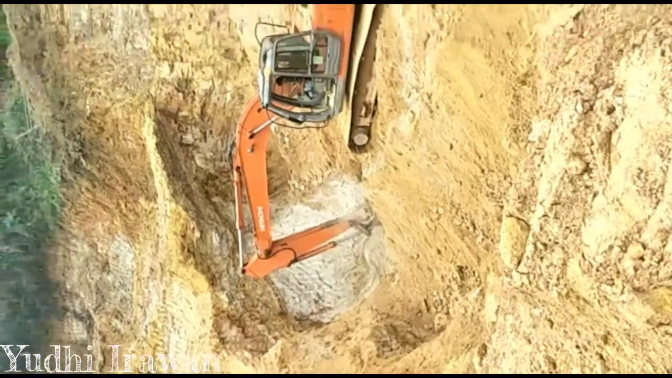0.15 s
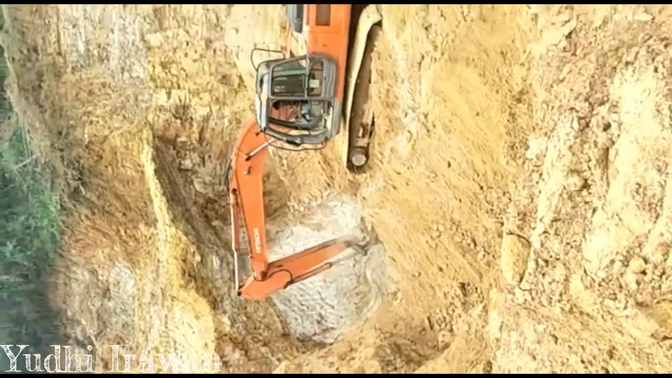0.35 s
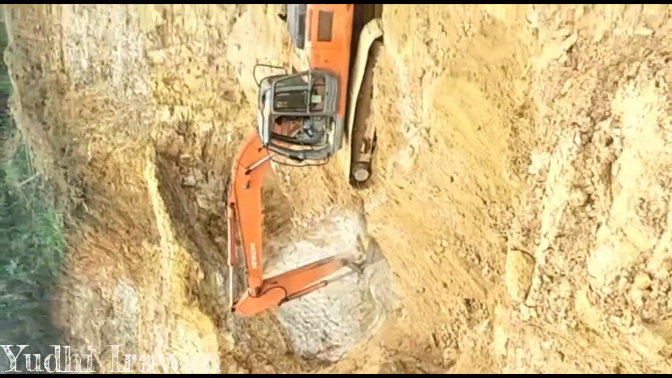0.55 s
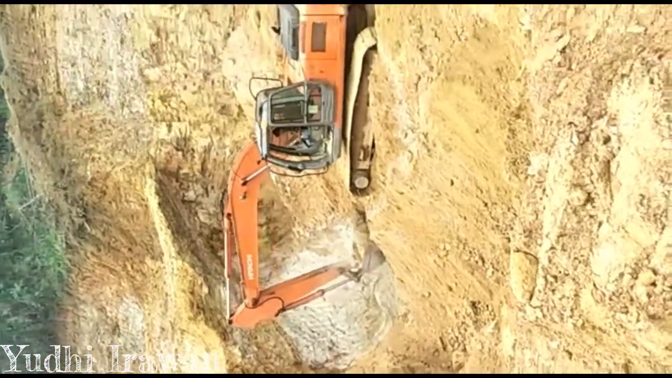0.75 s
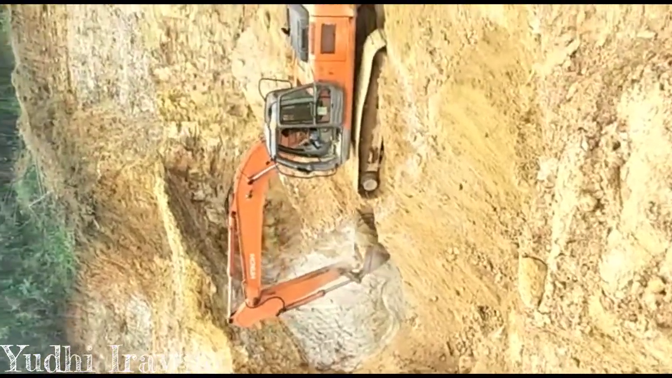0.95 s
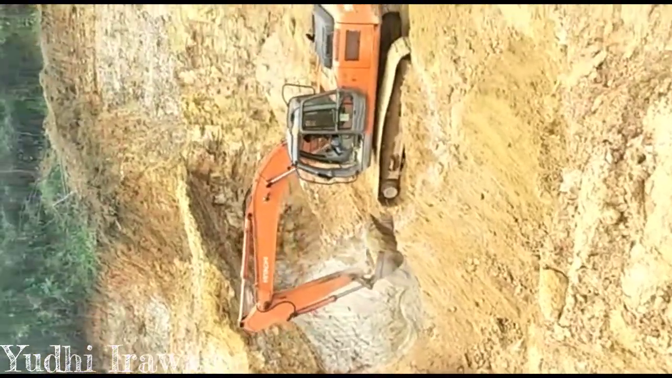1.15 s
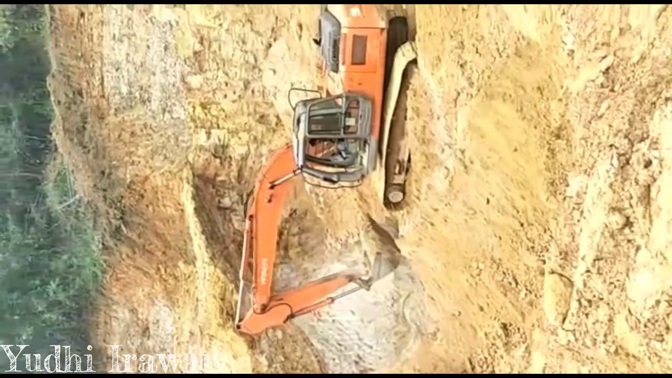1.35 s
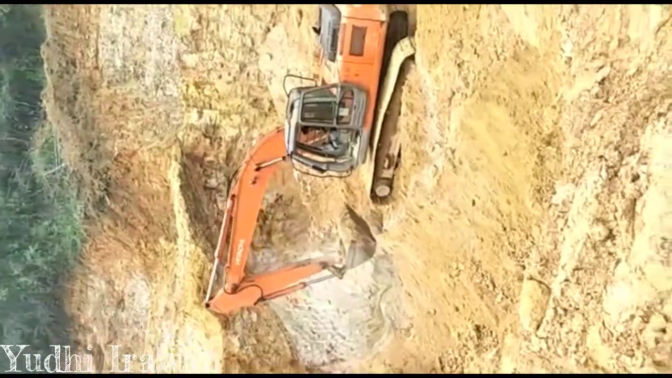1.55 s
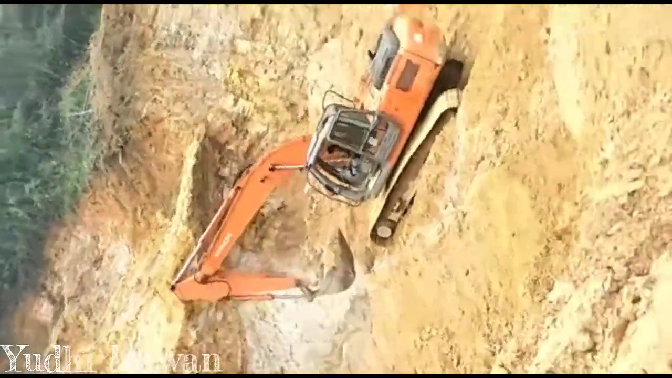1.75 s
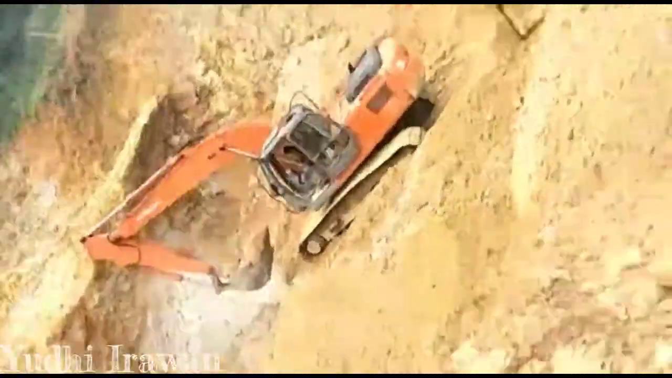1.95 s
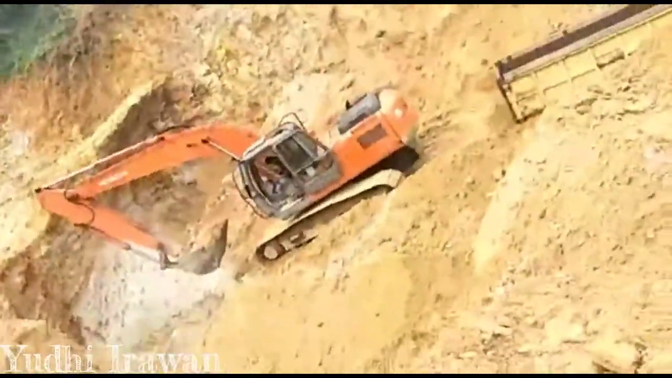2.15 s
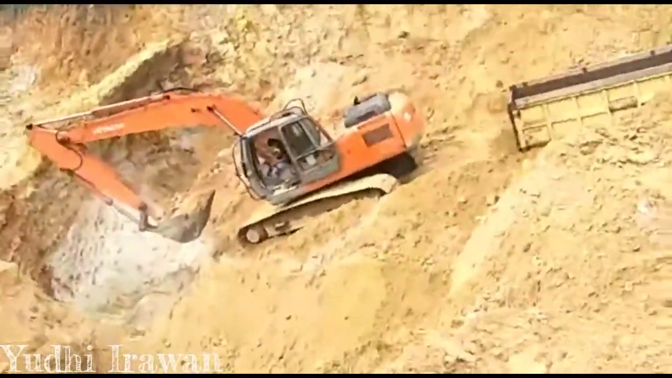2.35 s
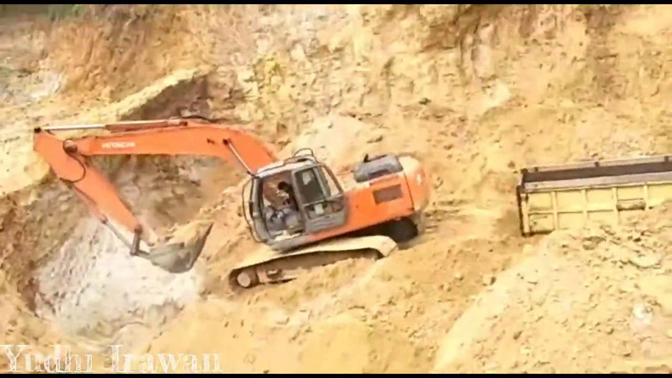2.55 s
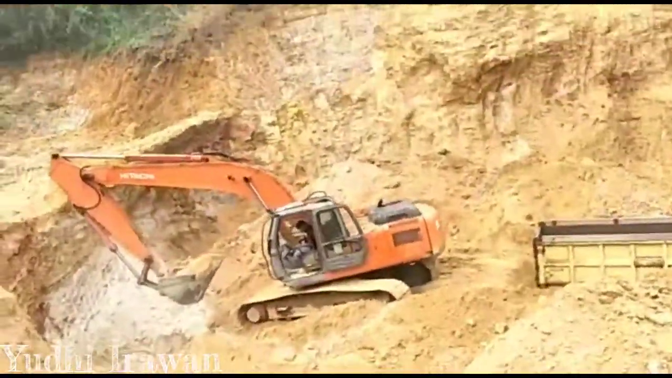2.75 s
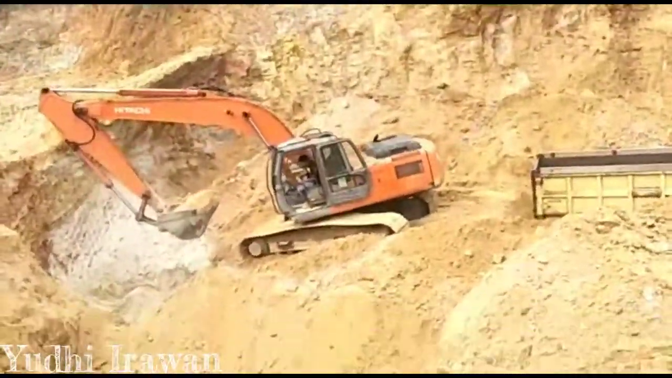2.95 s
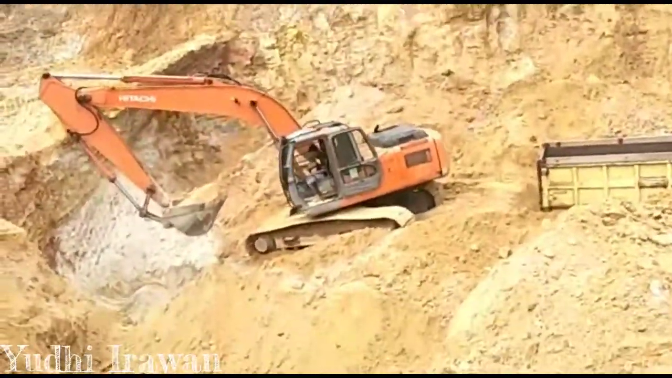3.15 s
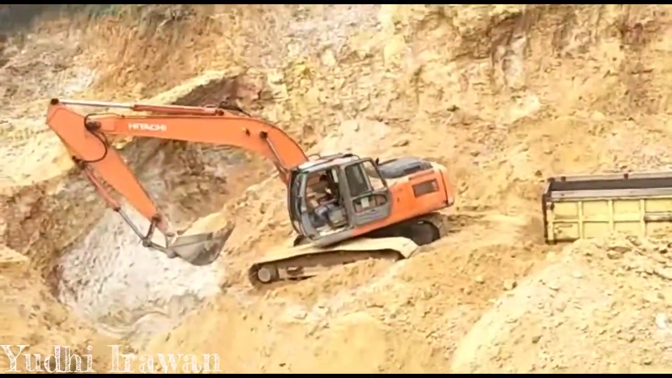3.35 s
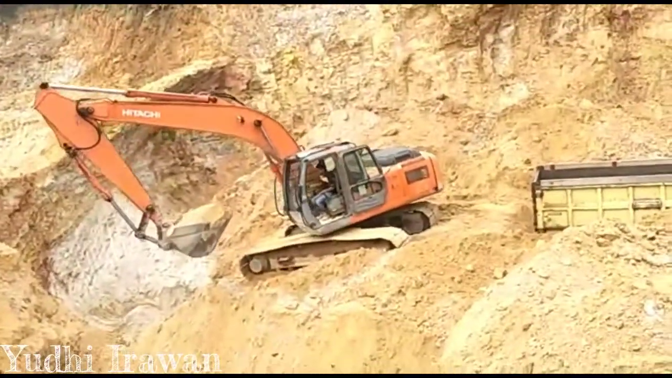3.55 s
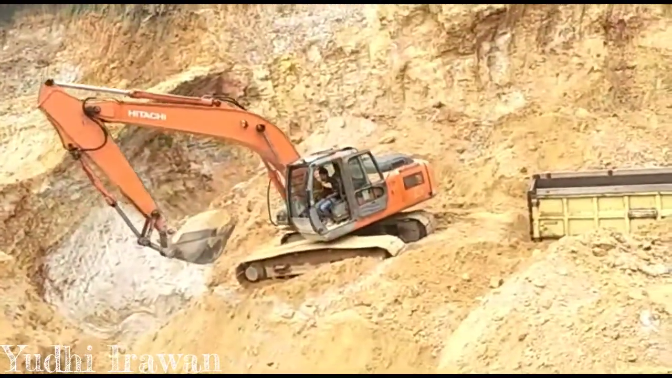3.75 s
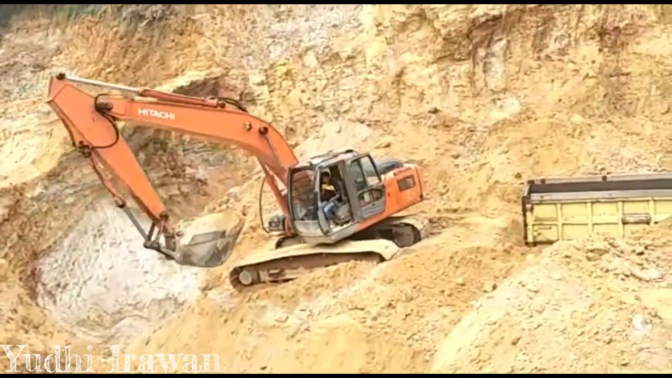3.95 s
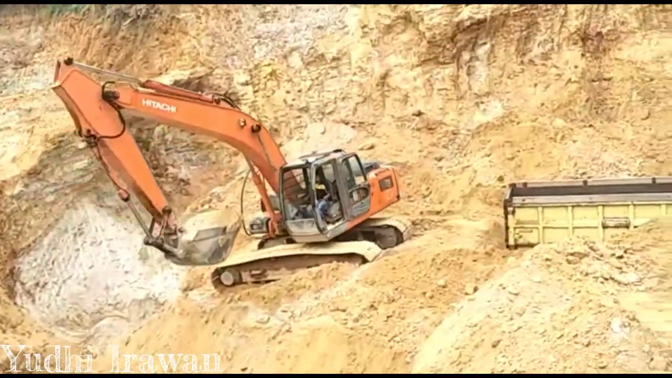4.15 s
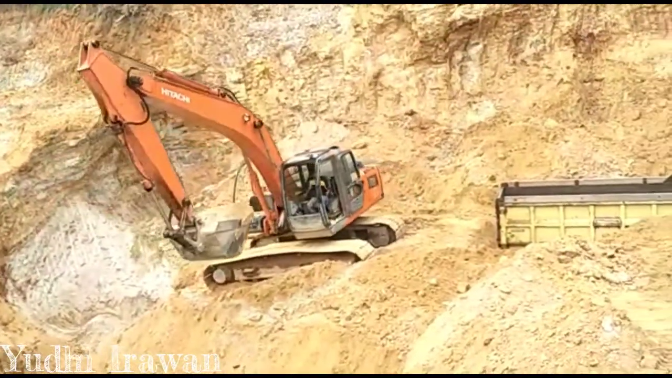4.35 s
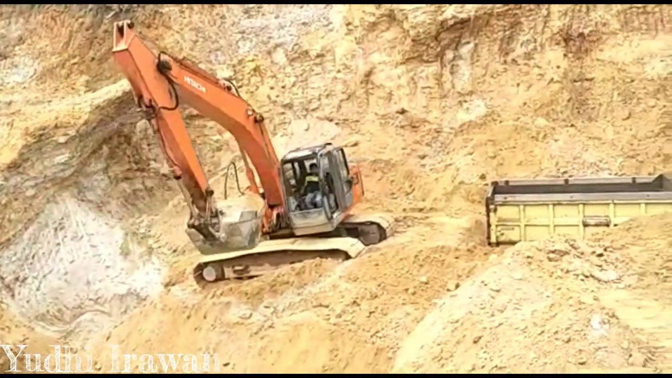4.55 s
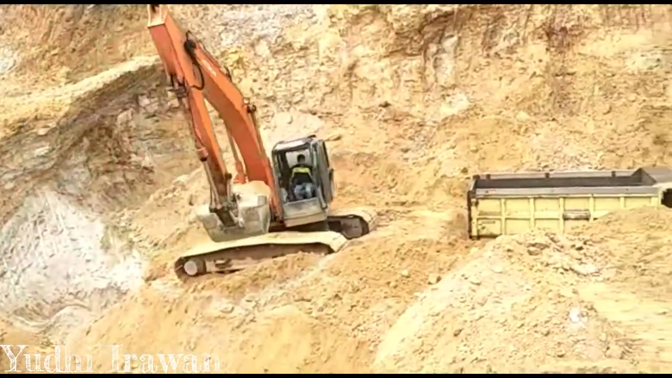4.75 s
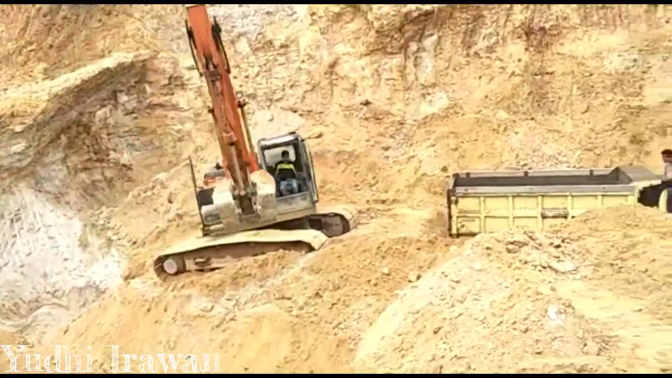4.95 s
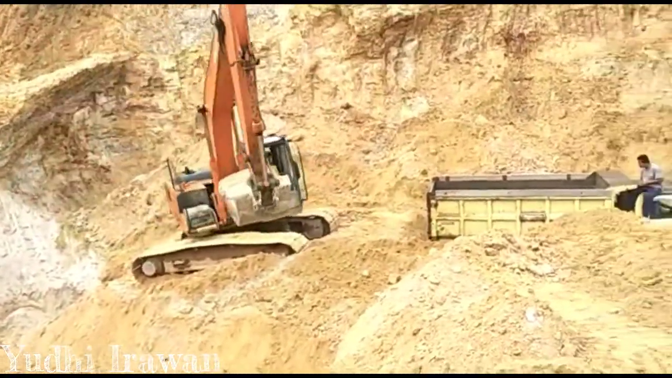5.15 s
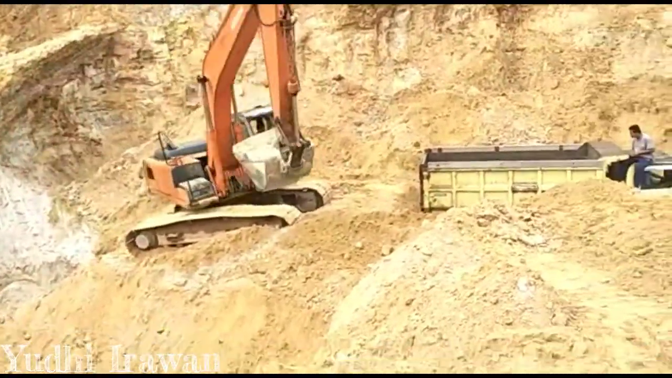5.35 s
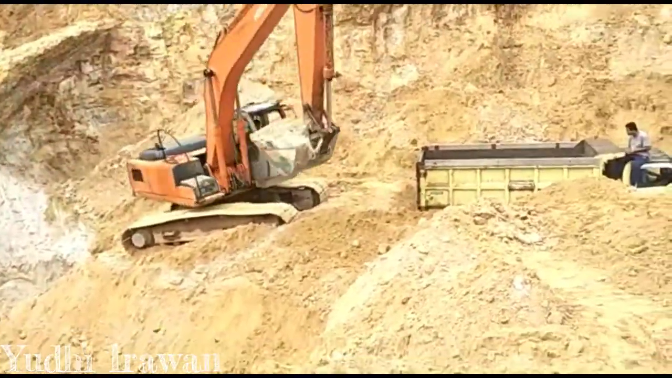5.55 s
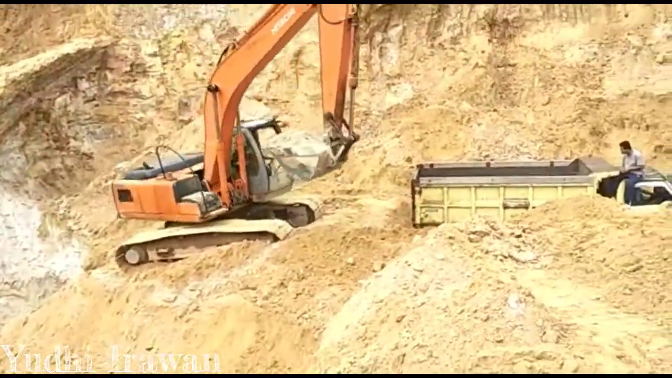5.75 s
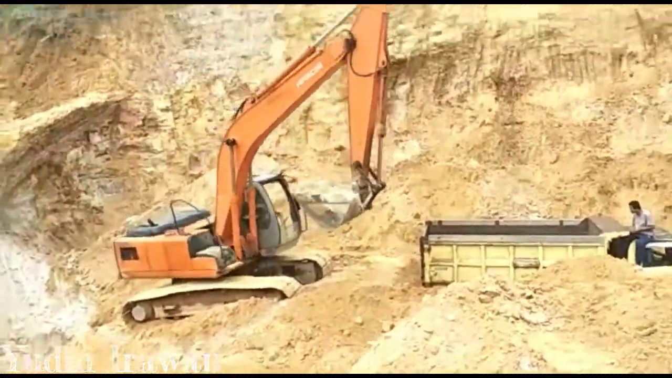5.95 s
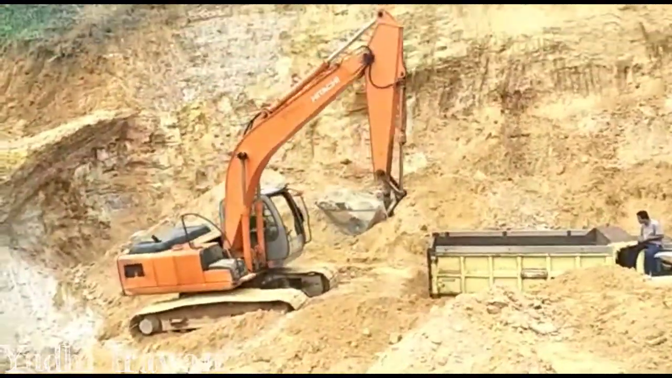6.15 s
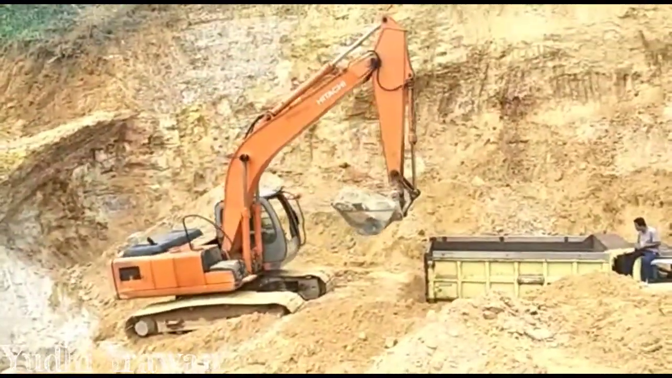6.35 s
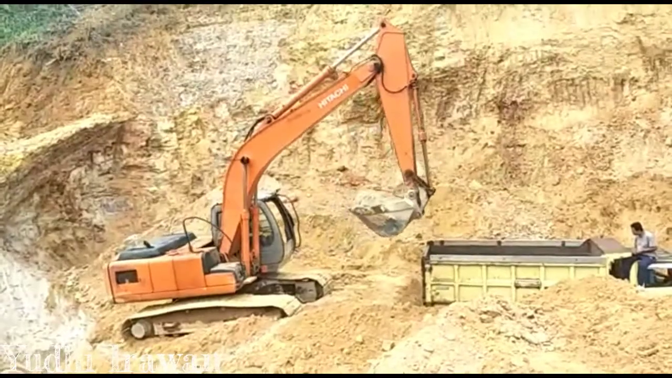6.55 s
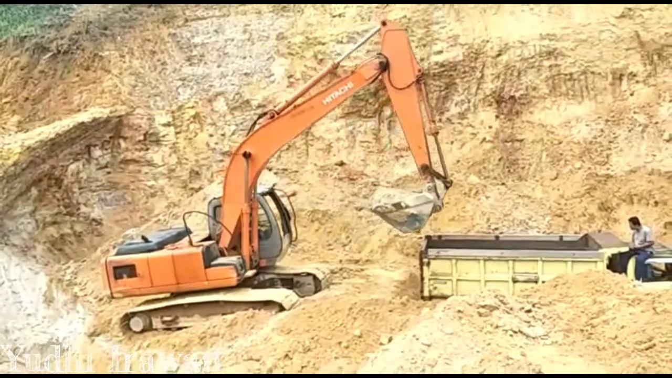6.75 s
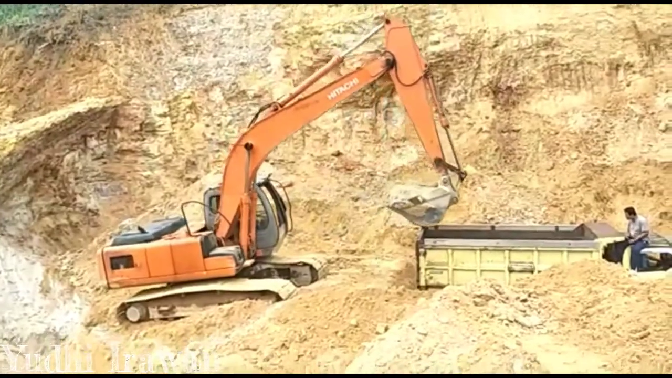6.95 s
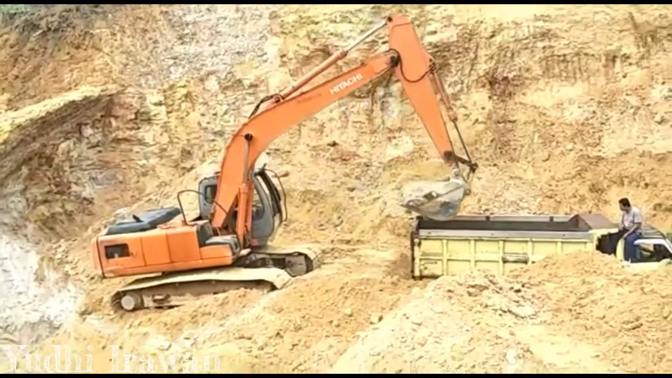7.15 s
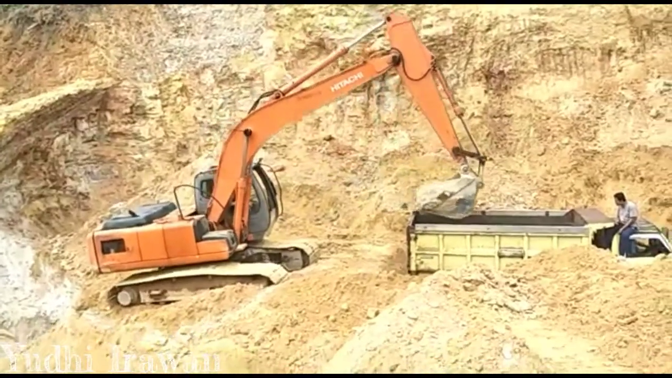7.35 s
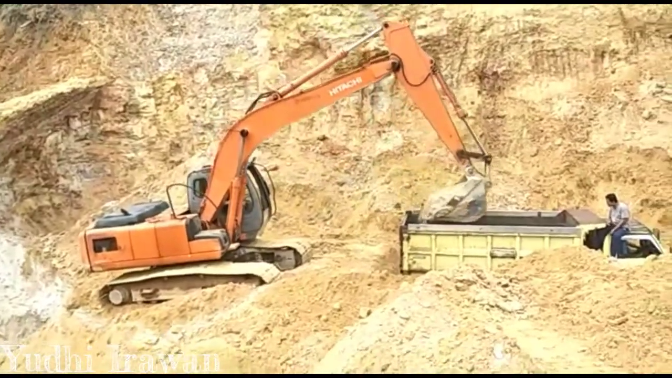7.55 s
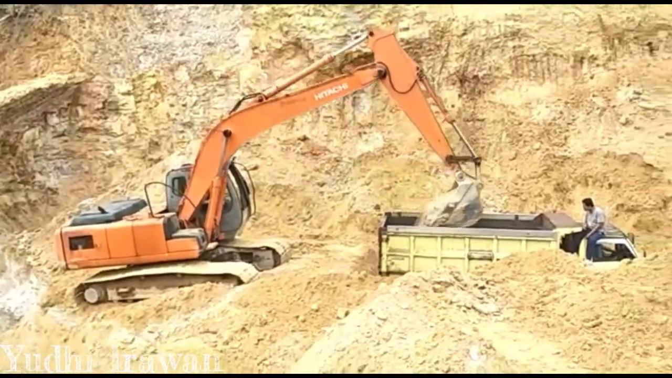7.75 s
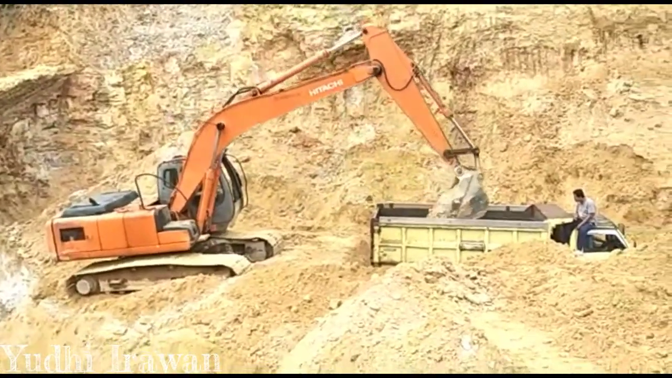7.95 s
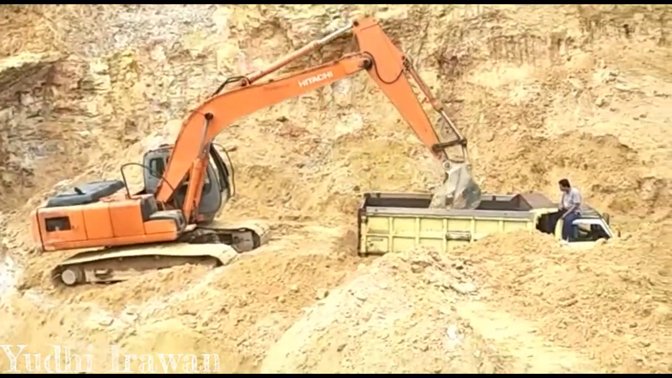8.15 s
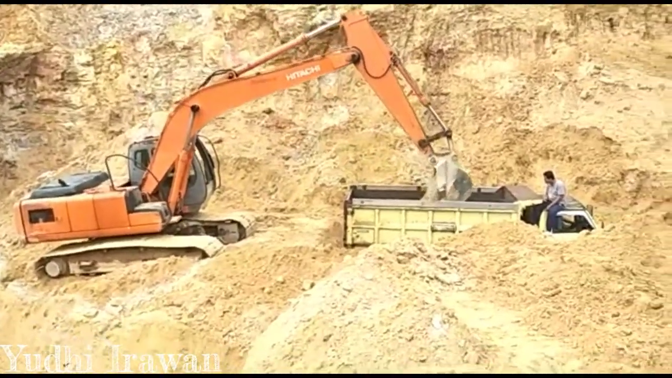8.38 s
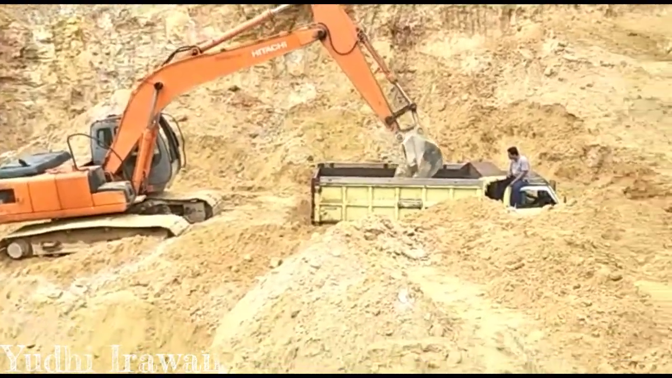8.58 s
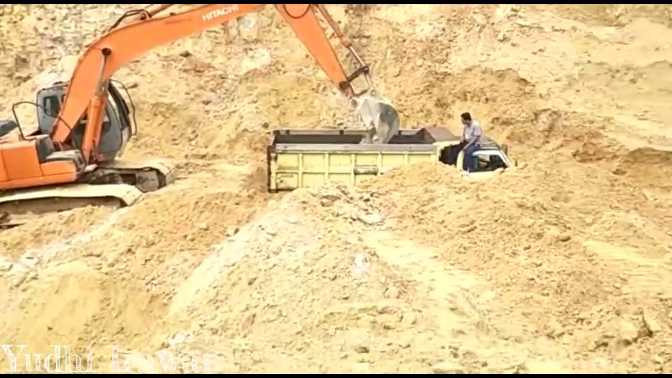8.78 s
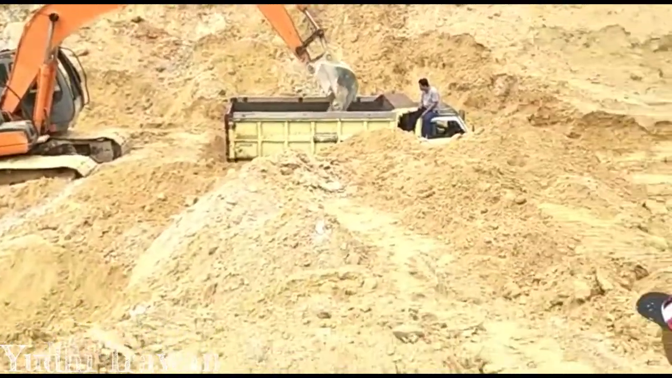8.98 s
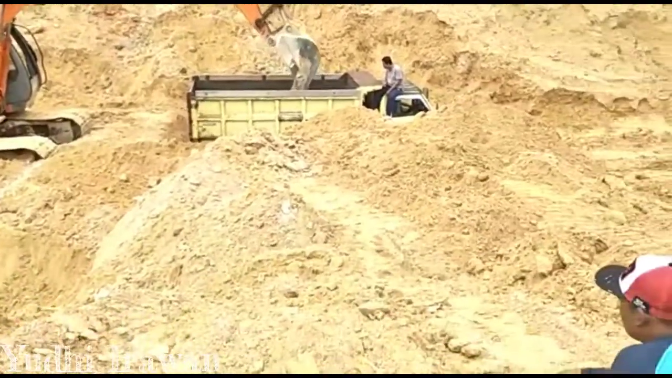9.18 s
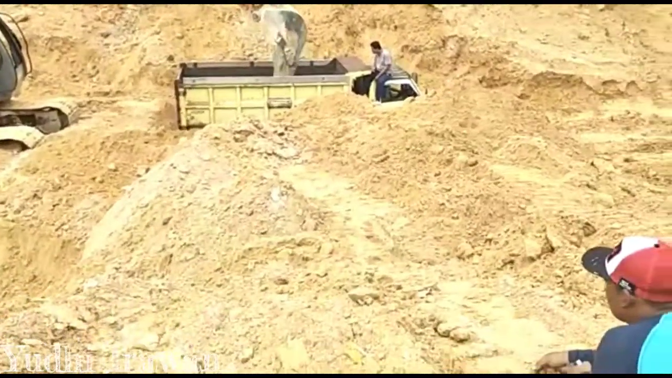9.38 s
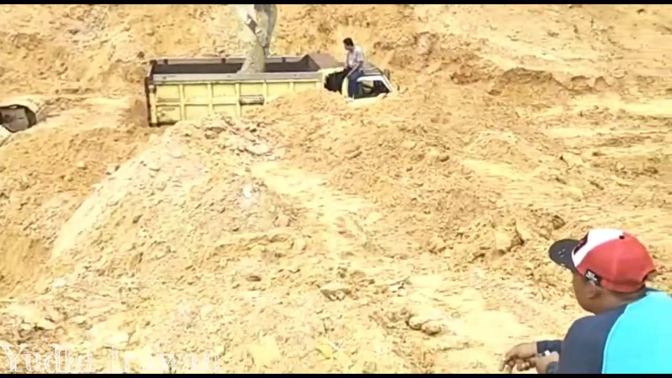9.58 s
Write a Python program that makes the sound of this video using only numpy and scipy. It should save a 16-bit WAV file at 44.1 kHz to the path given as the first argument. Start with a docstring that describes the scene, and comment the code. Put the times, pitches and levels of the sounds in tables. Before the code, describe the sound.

A diesel excavator runs steadily in an open quarry, heard from some distance on a hand-held stereo microphone. Its low throbbing hum carries pump whines and faint hydraulic squeals, with a few dull knocks of rock on steel. As the machine turns, a motor tone rises twice and the engine grows louder and brighter. Near the end, stones and gravel drop into a steel truck bed with a brief ringing crunch.

```python
"""A six-cylinder diesel excavator drones in an open pit, some way from a hand-held stereo microphone.
Exhaust, gear and pump tones ride on the crank speed over the roar of fan and block. The swing motor
climbs in pitch as the machine turns its engine side to the microphone, and oil squeals in the valves.
Rocks knock on steel, and near the end a load drops into a truck bed and rings it.
The sound fades in after a short silence."""
import sys
import numpy as np
from scipy import signal
from scipy.fft import rfft, irfft, next_fast_len
from scipy.io import wavfile
from scipy.ndimage import uniform_filter1d, map_coordinates

SR = 44100
rng = np.random.default_rng(int(sys.argv[2]) if len(sys.argv) > 2 else 0)


def int16_out(signal):
    """Quantize to a 16-bit WAV file."""
    q = np.round(np.clip(np.atleast_2d(signal).T, -1, 1) * 32767)
    wavfile.write(sys.argv[1], SR, q.astype(np.int16))


N = 424241

# engine speed: (time [s], crank turns [Hz])
CRANK_SPEED = [(.55, 33.7), (1.1, 34.05), (1.7, 33.9), (3.2, 33.45), (4.2, 33.7), (5.3, 33.71),
               (5.9, 34.09), (6.4, 33.6), (6.82, 32.98), (7.4, 33.46), (8.3, 33.9), (8.73, 34.6),
               (8.95, 34.22), (9.32, 33.3), (9.62, 33.4)]
# overall level, rising slowly to about 2.2 s, then swinging gently: (time [s], gain [dB])
OVERALL_GAIN = [(.55, -5.5), (1, -5.5), (2.2, -0.7), (3.7, 0.2), (4.9, -0.5), (5.5, -1), (6.5, 1.36),
                (7.5, 0.06), (8.5, -0.36), (9.62, -1.8)]
# stereo image in three views: microphone upright, level on the cab side, on the engine side:
# (frequency [Hz], left-right likeness [0-1], left lead [rad], left minus right [dB])
UPRIGHT_IMAGE = [(40, 0.998, 0.5, -0.5), (101, 0.97, 0, -1), (290, 0.99, 0, -1), (520, 0.98, -0.2, -20),
                 (720, .94, 0.2, 10), (1100, 0.88, 0.74, -3), (1800, 0.98, 1.67, -4), (2100, .3, 2, -1),
                 (2480, 0.95, 4, 8), (3350, .4, 3, 8), (3570, 0.86, 3, -3.5), (3700, 1, 4.5, 6.5),
                 (5140, 0.45, 11, 0), (6200, 0.89, 10.5, -0.5)]
CAB_IMAGE = [(40, 0.998, 0.02, -0.3), (101, 1, .02, -0.3), (500, 1, 0.16, 0), (900, 1, -.1, -0.5),
             (1200, 0.91, 0.36, -2.5), (1480, 0.68, 0.25, 1), (2100, 1, 0.13, -4), (2750, 0.45, 0.12, 3.5),
             (3600, 0.24, -0.65, -1.5), (4000, 0.94, -0.2, -7), (5000, 0.17, -0.4, 3.5),
             (8000, 0.15, 0, -8.5)]
ENGINE_IMAGE = [(40, .998, 0.5, -0.5), (101, 0.98, 0.2, 0), (200, 0.99, 0.16, -0.1), (383, 1, -0.46, -2),
                (550, 0.86, 2, -4.5), (685, 1, 0, 8.5), (1140, 0.66, 1.13, -7.5), (1670, 0.72, 4.5, 1),
                (2220, 0.38, 3.5, -3.5), (2674, 0.47, 5, 0), (4090, 0.35, 16.5, 0),
                (5000, 0.92, 16.5, -1.5), (5280, 0.33, 11, 0.5)]


def engine_drone(phase, shares):
    """The firing tone, its octave and overtones, plus a pump or fan hum at 7 times crank speed."""
    # (time [s], level of orders 6, 12, 14 [dB])
    drone = [(.55, -29, -44, -41.5), (1.5, -26, -59.5, -48.5), (2, -25, -56, -45.5), (2.5, -25, -41, -37),
             (3.1, -25, -35, -51), (3.6, -24.5, -43, -37), (4, -23, -41, -32.5), (4.4, -24, -45, -55),
             (4.8, -26.5, -38.5, -34.5), (5.55, -21, -30, -29.5), (5.87, -26, -39, -37),
             (6.36, -34.5, -31, -27), (6.85, -25, -26, -25.5), (7.4, -26.5, -23.5, -33.5),
             (8.1, -25.5, -25.5, -29), (8.55, -24, -26.5, -28), (8.86, -23, -30, -45),
             (9.2, -25.5, -24.5, -26.5), (9.62, -28.5, -23.5, -27)]
    # (time [s], level of orders 10, 11, 18, 20 [dB])
    overtones = [(0.55, -67, -46.5, -54, -58), (1.5, -55, -41.5, -46.5, -48), (2.5, -57.5, -40, -40.5, -53),
                 (3.6, -44.5, -40.5, -37.0, -46.0), (4.4, -39.5, -39, -54, -50), (5, -38, -37.0, -46, -50),
                 (5.3, -34, -33, -47, -48.5), (5.7, -36.0, -26.5, -32.5, -46), (6, -33, -28.5, -34.5, -39),
                 (6.3, -39.5, -44, -35, -54), (6.6, -39.5, -29, -37, -34.5), (6.9, -36.0, -34, -29, -40),
                 (7.3, -32.0, -38, -38.5, -41), (7.7, -40, -49, -41, -39), (8.1, -41, -34, -38, -42),
                 (8.55, -39.0, -45.0, -32.5, -38), (8.9, -38.5, -33.0, -29, -45),
                 (9.25, -44, -33.0, -37, -40), (9.55, -36.0, -40.0, -31.5, -40.5)]
    out = 0
    for order, db, waver_db, blur_rad in zip((6, 12, 14), curves(drone), (1.17, .6, .6), (.05, .33, .33)):
        out += tone(order, db, phase, shares, waver_db, blur_rad)
    for order, db in zip((10, 11, 18, 20), curves(overtones)):
        out += tone(order, db, phase, shares, waver_db=2.2, blur_rad=0.3)
    return out


def high_whines(phase, shares):
    """Three high whines that follow crank speed, from engine, gear and pump."""
    # (time [s], level of orders 48, 68, 84 [dB])
    levels = [(0.55, -69, -59, -82), (2, -54.5, -67.5, -57), (3.5, -48, -52.5, -72),
              (5.2, -49.5, -53, -61.5), (5.9, -43, -45, -62), (6.3, -38.5, -42, -52), (6.6, -46, -35, -57),
              (6.8, -30.5, -36.5, -55), (7.05, -42.5, -39, -49), (7.4, -37, -37, -39.5),
              (7.8, -39, -37, -43.5), (8.25, -45, -35.5, -39.5), (8.55, -44, -40, -55),
              (8.9, -46, -39.5, -48), (9.25, -39, -36, -39), (9.55, -42, -31, -43)]
    return sum(tone(order, db, phase, shares, waver_db=1.3, blur_rad=1.37, lean_db=lean_db)
               for order, db, lean_db in zip((48, 68, 84), curves(levels), (-3, -3, -6)))


def pump_whine(phase, shares, lull_db):
    """Two tones of the hydraulic pump; load lifts the lower and weakens the upper."""
    # (order, level at facing 0, 0.8 and 1 [dB], share of the swell, gain by crank sag [dB/Hz^2],
    # waver [dB], left minus right [dB])
    whines = [(28, -43.5, -43, -33, 1.1, 1.5, 2.5, -1), (42, -55, -48, -47, .8, -4, 3, -1)]
    # swell of the whine: (time [s], gain [dB])
    swell = [(.55, -5), (1.75, -4), (2, 2), (2.75, 3), (3, -2), (3.6, -3), (4.4, 2), (5.1, -3), (5.9, 1.5),
             (6.8, 0.5), (7.8, 4), (8.75, -3), (9.15, -0.8), (9.62, -1)]
    out = 0
    for order, *levels, share, load_db, waver_db, lean_db in whines:
        db = np.interp(shares[-1], (0, 0.8, 1), levels) + lull_db + share * curves(swell)[0]
        db += load_db * np.maximum(sag_hz(), 0) ** 2
        out += tone(order, db, phase, shares, waver_db, blur_rad=1.85, lean_db=lean_db)
    return out


def weak_tones(phase, shares, lull_db):
    """Weak engine orders around the main tones, plus two sidebands of the gear whine."""
    # (order before rounding, cab side [dB], engine side [dB])
    weak_orders = [(3, -52, -41.5), (4, -59, -47), (7, -66, -54), (8, -44.5, -42), (9, -51, -39),
                   (13, -62, -43), (22, -55, -46), (15, -50.5, -42), (16, -47, -40.5), (19, -50.5, -47),
                   (21, -58.5, -46), (24, -54.5, -45), (25, -57, -46.5), (65.9, -63.5, -47),
                   (70.1, -64.5, -47), (56, -52.5, -43.5)]
    out = 0
    for order, cab_db, engine_db in weak_orders:
        db = cab_db + shares[-1] * (engine_db - cab_db) + lull_db
        out += tone(round(order), db, phase, shares, waver_db=2.5, blur_rad=0.81)
    return out


def tone(order, db, phase, shares, waver_db, blur_rad, lean_db=0):
    """One multiple of the cycle rate at the microphone; level and phase waver with the air."""
    hz = order * np.mean(np.diff(phase)) * SR / (2 * np.pi)
    images = [along(image, hz) for image in (UPRIGHT_IMAGE, CAB_IMAGE, ENGINE_IMAGE)]
    _, lead, lean = np.transpose(images) @ shares / 2
    lean = lean + lean_db / 2
    locked = order % 2 == 0 and order <= 14  # low crank multiples line up: one throb a turn
    angle = order * phase + rng.uniform(0, 2 * np.pi) * (not locked) + blur_rad * wobble(1.6)
    size = np.sqrt(2) * amp(db + waver_db * wobble(4.5))
    return size * np.array([amp(lean) * np.sin(angle + lead), amp(-lean) * np.sin(angle - lead)])


def roar(phase, shares):
    """Fan, block and intake noise; it throbs with each crank turn and with the valve clatter."""
    # noise colour in each view, low and high bands: (frequency [Hz], relative level [dB])
    cab_low = [(15, -48), (30, -26.5), (60, -9.5), (95, -10), (130, -6.5), (200, -9.5), (306, -4),
               (420, -19), (545, -35), (826, -26), (1500, -37.5), (2400, -89)]
    cab_high = [(880, -44.5), (1500, -4.5), (1880, 2.5), (2120, 0), (2390, -7), (2740, -3), (3150, -9.5),
                (3470, -1.5), (3720, -9), (4110, -11.5), (5750, -23), (7150, -34), (9150, -53),
                (14400, -50), (15900, -58.5)]
    upright_high = [(880, -35.5), (1500, 2), (1830, 6.5), (2000, -1.5), (2430, -1.5), (2940, -17.5),
                    (3120, -0.5), (3540, -7), (3950, -6), (6740, -19), (8880, -44), (9150, -66),
                    (10200, -36.5), (11100, -57), (15900, -57)]
    engine_low = [(15, -36.5), (30, -23), (60, -13), (95, -12), (146, -3.5), (218, -2.5), (330, -5),
                  (464, -10), (566, -28), (797, -16), (1100, -17), (1500, -23), (2400, -81.5)]
    engine_high = [(880, -40), (1500, -5.5), (1880, 0), (2430, -1.5), (2770, -0.5), (3150, -5.5),
                   (3580, -5), (4490, -5.5), (4860, -13.5), (5470, -10), (6220, -16), (6940, -27.5),
                   (10400, -39), (14000, -34.5), (15900, -33.5)]
    views = [noise_bands(cab_low, upright_high, UPRIGHT_IMAGE, patchy_db=1.54),
             noise_bands(cab_low, cab_high, CAB_IMAGE, patchy_db=1.28),
             noise_bands(engine_low, engine_high, ENGINE_IMAGE, patchy_db=1.11)]
    crank = np.cos(2 * phase)
    valves = np.cos(3 * phase) + 0.31 * np.cos(6 * phase)
    gust_db = 0.27 * wobble(4.9)
    crank_db, valve_db = (0.31, 0.57, 0.3, .5, .4), (0, 0.1, 0.18, 0.42, .5)
    flutter_db = (0.31, 0.13, 0.21, 0.41, .9)
    out = 0
    for k, db in enumerate(band_levels(shares[-1])):
        throb = crank_db[k] * crank + valve_db[k] * valves + gust_db + flutter_db[k] * wobble(16)
        out += amp(db + throb) * sum(np.sqrt(share) * view[k] for share, view in zip(shares, views))
    return out


def noise_bands(low, high, image, patchy_db):
    """The machine's noise across the pit in one view, as five stereo bands of equal level."""
    # moving notch as the microphone turns and is shaded: (time [s], frequency [Hz], depth [dB])
    shading_dip = [(0, 1970, 1.5), (1.8, 1954, 3.5), (2.8, 1430, 0), (5.2, 1340, 4.5), (6, 1740, 0),
                   (9.62, 1680, 2.5)]
    hz, t, noise = signal.stft(rng.standard_normal((2, N)), SR, nperseg=1024)
    hz = hz[:, None]
    patches = unit(uniform_filter1d(uniform_filter1d(rng.standard_normal(noise.shape[1:]), 8, 0), 6, 1))
    scatter_db = patchy_db * (1 + (hz / 6000) ** 2).clip(1, 3.5) * patches  # air scatters treble most
    dip_hz, dip_db = curves(shading_dip, t)
    gain = amp(scatter_db - dip_db * np.exp(-((hz - dip_hz) / 250) ** 2))
    alike, lead, lean = along(image, hz)
    spread = np.arccos(np.clip(alike, 0, 1)) / 2
    mid, side = noise[0] * np.cos(spread), noise[1] * np.sin(spread)
    pan = amp(lean / 2) * np.exp(.5j * lead)
    spectra = gain * np.array([(mid + side) * pan, (mid - side) / pan])
    pair = signal.istft(spectra, SR, nperseg=1024)[1][:, :N]
    lowpasses = [lambda f, edge_hz=e: 1 / (1 + (f / edge_hz) ** 16) for e in (560, 1500, 4700, 7000)]
    edges = [lambda f: 0] + lowpasses + [lambda f: 1]
    bands = []
    for colour, lower, upper in zip((low, low, high, high, high), edges, edges[1:]):
        band = filtered(pair, lambda f: amp(along(colour, f)[0]) * np.sqrt(np.abs(upper(f) - lower(f))))
        bands.append(band / np.std(band.mean(axis=0)))
    return bands


def band_levels(facing):
    """Levels in dB of rumble, roar, clatter, rattle and hiss; the first four follow facing and load."""
    # (cab side [dB], engine side [dB], share of hiss swings, share of clatter, gain by sag [dB/Hz])
    bands = [(-34, -25, .05, .05, -1.5), (-39, -32.5, .05, -.2, -0.6), (-42.5, -36, .05, 0.81, 0.55),
             (-57, -50.5, .2, 0.2, 1.5)]
    # top band: (time [s], level [dB])
    hiss_level = [(.55, -80.5), (.9, -89), (1.4, -73.5), (2.15, -69.5), (2.6, -76), (3.2, -71), (4.3, -76),
                  (5.3, -66), (6.2, -54.5), (7.4, -54), (8.8, -58.5), (9.62, -54.5)]
    # lift of the upper bands: (time [s], gain [dB])
    clatter_gain = [(.55, -0.5), (.9, 0), (2.7, 1.5), (4.9, -2), (5.4, -0.4), (6.2, -0.2), (7.5, -1.2),
                    (9.3, 3), (9.62, 5)]
    (hiss,), (gain,), (clatter,) = curves(hiss_level), curves(OVERALL_GAIN), curves(clatter_gain)
    swings = hiss - uniform_filter1d(hiss, 2 * SR)
    return [cab + facing * (engine - cab) + gain + follow * swings + clank * clatter + load * sag_hz()
            for cab, engine, follow, clank, load in bands] + [hiss]


def swing_motor():
    """The swing motor sounds twice, climbing in pitch as it turns the house."""
    # (time [s], pitch [Hz], level [dB])
    swing = [(4., 422.3, -51), (4.55, 475, -41), (5., 500, -56), (5.1, 494, -72), (6.4, 283.5, -72),
             (6.6, 300, -34), (7.3, 351.5, -29), (7.45, 354.2, -68.5)]
    hz, db = curves(swing)
    started = np.arange(N) / SR > swing[0][0]
    return np.sqrt(2) * amp(db + 0.56 * wobble(10)) * np.sin(np.cumsum(hz) * 2 * np.pi / SR) * started


def rock_knocks():
    """Rock hits steel with a dull knock: one low, quickly damped tone each."""
    # (time [s], level [dB], pitch [Hz], time to fall 60 dB [s])
    knocks = [(1.791, -14, 168, 0.067), (2.048, -25, 259, 0.085), (6.05, -22, 470, 0.12),
              (8.43, -17, 430, 0.18)]
    out, t = np.zeros(N), np.arange(SR // 4) / SR
    rise = 1 - np.exp(-t / 0.0038)
    for start, db, hz, t60 in knocks:
        out[round(start * SR):][:len(t)] += amp(db - 60 * t / t60) * rise * np.sin(2 * np.pi * hz * t)
    return out


def falling_load():
    """Stones ring the steel truck bed, each most near its own pitch, as gravel crunches in."""
    # stone hits: (time [s], strength [dB], best excited frequency [Hz])
    stones = [(8.342, -24, 1900), (8.366, -35, 900), (8.363, -28, 2750), (8.381, -12.5, 2740),
              (8.395, -13.5, 2100), (8.41, -27, 1300), (8.442, -37, 870)]
    # modes of the bed: (frequency [Hz], gain [dB], time to fall 60 dB [s])
    modes = [(526.3, 15, 0.058), (870, 18, 0.06), (1270, 7.5, 0.068), (1870, 5, 0.029), (2100, -2, 0.041),
             (2710, 3, 0.034), (3440, -3, 0.027), (4100, -4, 0.021)]
    out, t = np.zeros((2, N)), np.arange(SR // 4) / SR
    rise = 1 - np.exp(-t / 0.0014)
    for start, db, best_hz in stones:
        rings = []
        for hz, mode_db, t60 in modes:
            octaves_off = abs(np.log2(hz / best_hz)).clip(0, 1.2)
            decay = amp(mode_db - 24 * octaves_off - 60 * t / t60)
            rings.append(decay * np.sin(2 * np.pi * hz * rng.normal(1, 0.008) * t))
        stereo_gains = amp(rng.normal(0, 1.7, (2, len(modes))))
        out[:, round(start * SR):][:, :len(t)] += amp(db) * rise * (stereo_gains @ np.array(rings))

    def bed_response(f):
        """The bed's modes as broad resonances, dulled in the treble."""
        peaks = sum(amp(db) * f * hz / 5 / np.abs(hz**2 - f**2 + 1j * f * hz / 5) for hz, db, _ in modes)
        return peaks / (1 + (f / 4600) ** 6)

    gravel = noise_burst(bed_response, peak_s=8.39, half_s=0.066, width=0.5)
    return out + amp(-24.5 + wobble(220)) * gravel


def oil_squeals():
    """Oil in the hydraulic valves squeals in narrow bands of noise."""
    # (peak time [s], half length [s], centre [Hz], half width [Hz], level [dB])
    squeals = [(2.32, 0.28, 5880, 610, -51.5), (1.85, 0.14, 6100, 150, -57), (1.7, .15, 5200, 150, -59),
               (1.2, 0.94, 3820, 110, -54.5), (1.1, .8, 4170, 90, -56), (2.53, 0.15, 3680, 200, -46),
               (2.75, .15, 4230, 130, -53), (3.1, .45, 3390, 90, -51), (3.35, 0.25, 4040, 99, -48),
               (3.38, .15, 4570, 80, -52.5), (5.42, 0.12, 3500, 150, -41.5), (9.4, 0.25, 6090, 520, -48),
               (9.14, 0.59, 2750, 250, -43)]
    out = 0
    for peak_s, half_s, hz, half_hz, db in squeals:
        band = lambda f: np.exp(-((f - hz) / half_hz) ** 2)
        out += amp(db) * noise_burst(band, peak_s, half_s, width=0.46)
    return out


def microphone_views():
    """Shares of the three views: upright, level on the cab side, and engine side (the facing)."""
    # how the microphone is held: (time [s], tilt [0 level to 1 upright])
    tilt = [(0, 0.9), (1.7, 0.85), (2.3, 0.069)]
    # side towards the microphone: (time [s], facing [0 cab to 1 engine])
    turn = [(0, 0.051), (4.9, 0.077), (5.9, 0.79), (9.62, 1.)]
    (upright,), (facing,) = curves(tilt), curves(turn)
    return np.array([upright * (1 - facing), (1 - upright) * (1 - facing), facing])


def sag_hz(usual_hz=33.69):
    """How far the load pulls the crank under its usual speed."""
    return usual_hz - curves(CRANK_SPEED)[0]


def noise_burst(response, peak_s, half_s, width):
    """Coloured stereo noise that swells and dies in a bell curve."""
    mid, side = unit(filtered(rng.standard_normal((2, N)), response))
    bell = np.exp(-((np.arange(N) / SR - peak_s) / half_s) ** 2)
    return bell * np.array([mid + width * side, mid - width * side])


def amp(db):
    return 10 ** (np.asarray(db) / 20)


def unit(x):
    return x / np.sqrt(np.mean(x ** 2) + 1e-20)


def along(points, hz):
    """Columns after the frequency, read on a log axis."""
    f, *cols = np.transpose(points)
    return [np.interp(np.log(hz + 1), np.log(f + 1), c) for c in cols]


def curves(rows, t=None):
    """Columns after the time, read at every sample or at times t."""
    times, *cols = np.transpose(rows)
    return [np.interp(np.arange(N) / SR if t is None else t, times, c) for c in cols]


def wobble(rate):
    """A smooth random curve, rate knots a second."""
    return map_coordinates(rng.standard_normal(int(N * rate / SR) + 4), [np.arange(N) * rate / SR])


def filtered(x, response):
    """x shaped by a frequency response."""
    size = next_fast_len(N + 8192)
    return irfft(rfft(x, size) * response(np.fft.rfftfreq(size, 1 / SR)), size)[..., :N]


def scene():
    """The excavator and the truck bed, heard from across the pit."""
    phase = np.cumsum(curves(CRANK_SPEED)[0]) * np.pi / SR  # one four-stroke cycle is two crank turns
    shares = microphone_views()
    lull_db = np.minimum(curves(OVERALL_GAIN)[0], 0)
    tones = engine_drone(phase, shares) + high_whines(phase, shares)
    tones += pump_whine(phase, shares, lull_db) + weak_tones(phase, shares, lull_db)
    return tones + roar(phase, shares) + swing_motor() + oil_squeals() + rock_knocks() + falling_load()


def record(dry):
    """Silence, a fade-in, a short fade-out, and nothing above the band limit."""
    start_s, fade_s, fade_db, top_hz = 0.29, 0.25, 12.5, 15550
    t = np.arange(N) / SR - start_s
    gate = np.clip(0.21 + t / 0.034, 0, 1) * (t > 0) * np.clip((t[-1] - t) / .003, 0, 1)
    fade_in = amp(-fade_db * np.clip(1 - t / fade_s, 0, 1))
    return filtered(dry * gate * fade_in, lambda hz: hz < top_hz)


dry = scene()
out = record(dry)
int16_out(out)
```